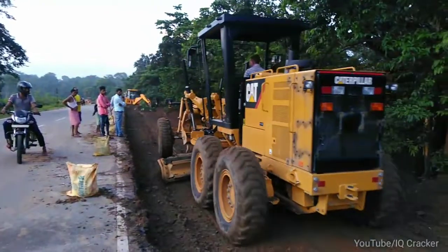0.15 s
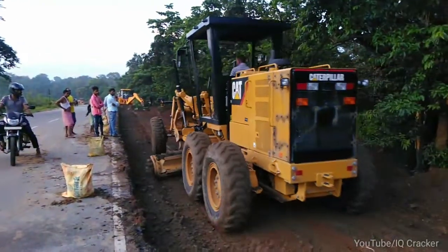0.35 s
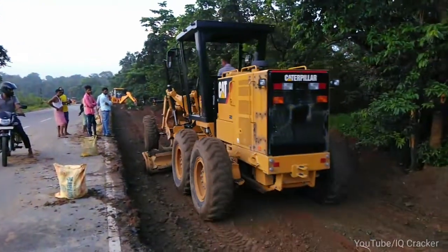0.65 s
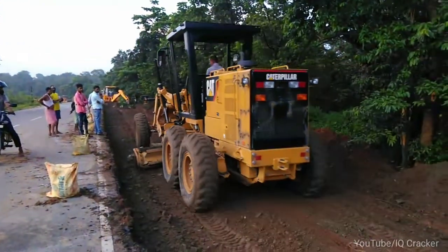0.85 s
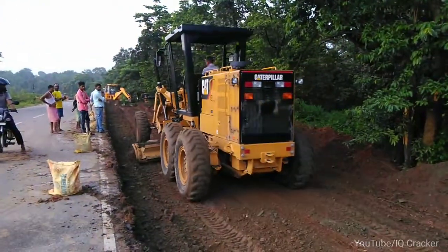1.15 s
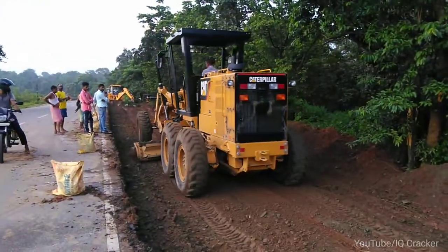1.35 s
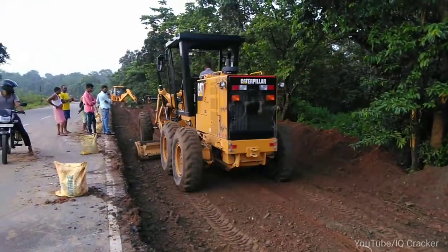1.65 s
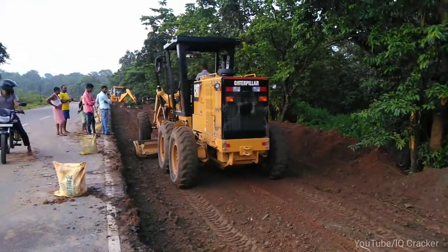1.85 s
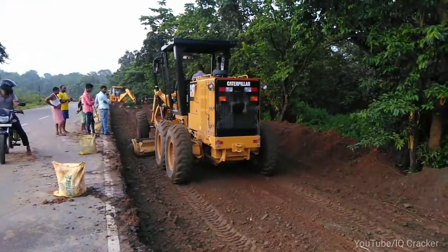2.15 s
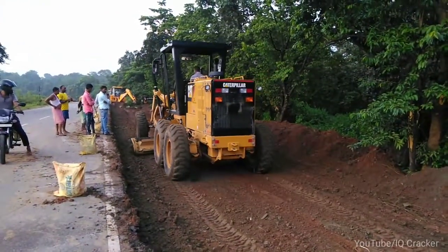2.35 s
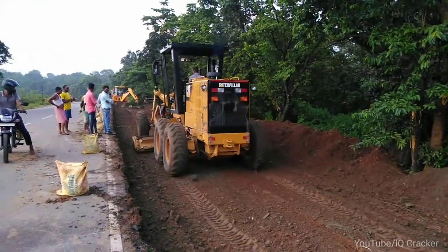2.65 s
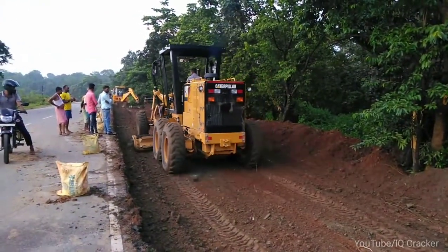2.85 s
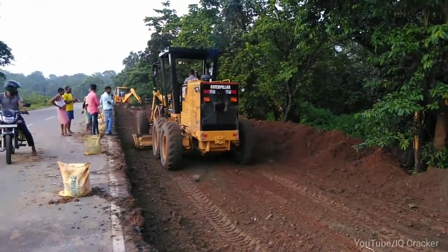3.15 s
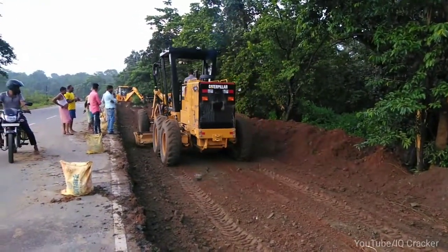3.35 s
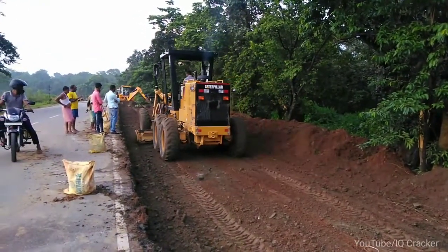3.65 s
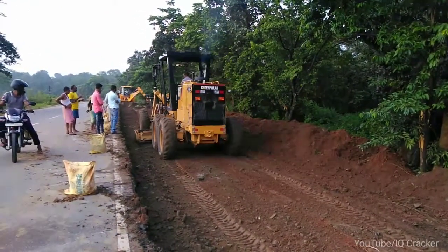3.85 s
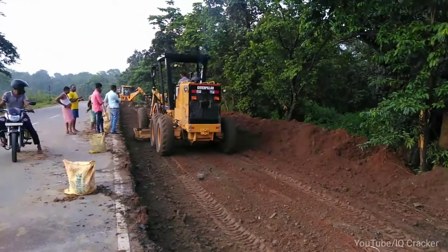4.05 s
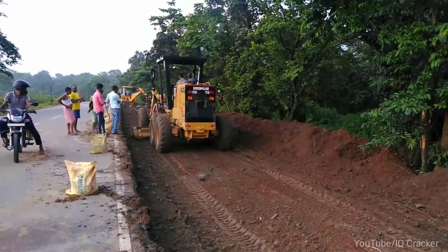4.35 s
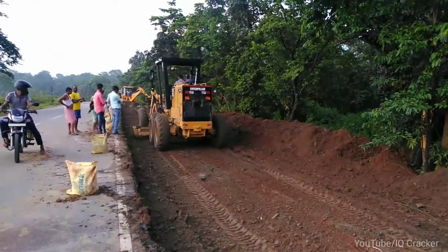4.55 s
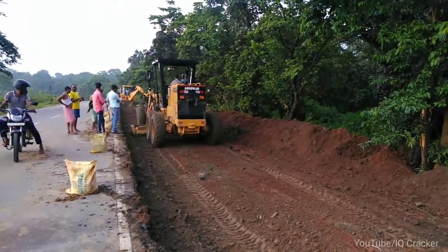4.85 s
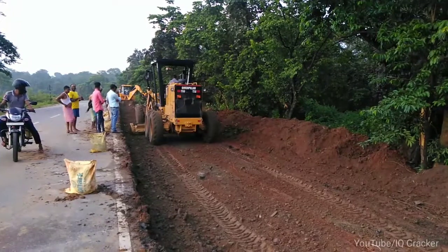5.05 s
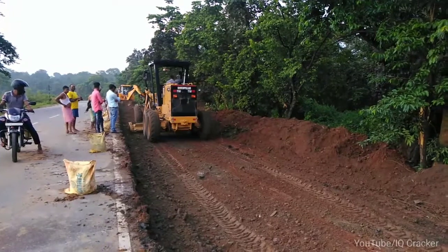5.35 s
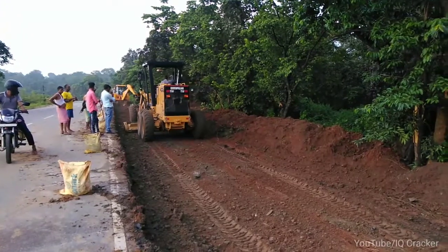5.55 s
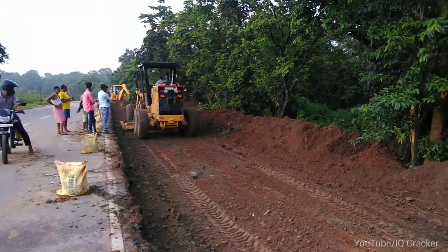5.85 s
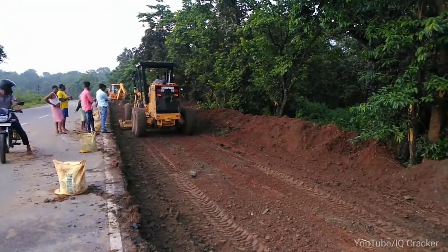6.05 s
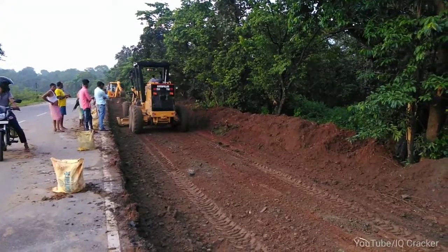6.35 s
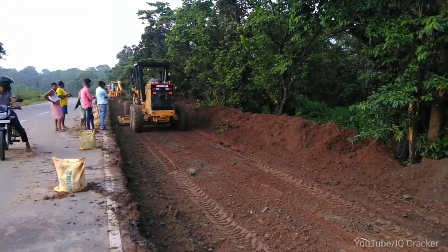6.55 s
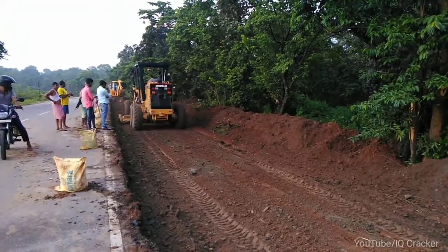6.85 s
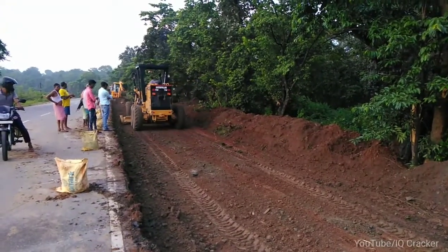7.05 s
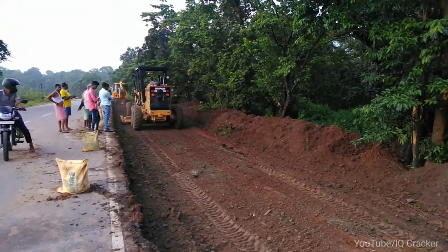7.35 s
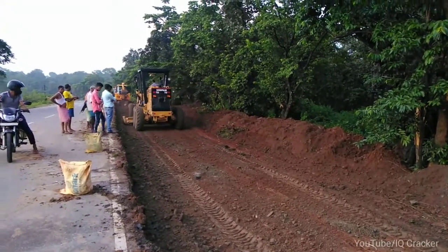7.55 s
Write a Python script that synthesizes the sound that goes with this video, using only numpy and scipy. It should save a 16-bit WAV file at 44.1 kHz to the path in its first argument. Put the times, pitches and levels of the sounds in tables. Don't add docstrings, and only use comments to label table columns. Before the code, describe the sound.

A heavy six-cylinder diesel machine runs lightly with whine and clatter, drops its revs through a clunking gear change, and lugs hard for under two seconds with deep booming puffs, a bright burst of rushing exhaust and rattling metal. The load abruptly lifts; quicker, thinner engine chatter recedes beside an earth bank, with scattered panel clanks. Open-air roadside, handheld stereo pickup, close at first and then farther away.

```python
import sys
import numpy as np
from scipy import signal
from scipy.fft import rfft, irfft, next_fast_len
from scipy.io import wavfile
from scipy.ndimage import uniform_filter1d, map_coordinates

SR = 44100
rng = np.random.default_rng(int(sys.argv[2]) if len(sys.argv) > 2 else 0)


def digitize_waveform(pressure):
    field = np.atleast_2d(pressure).T
    bounded = np.clip(field, -1, 1)
    quanta = np.round(bounded * 32767).astype(np.int16)
    wavfile.write(sys.argv[1], SR, quanta)


def gain_from_decibels(decibels):
    exponent = np.asarray(decibels, float) / 20
    return 10 ** exponent


N = 339129


def in_time(rows):
    s, *columns = np.transpose(rows)
    return [np.interp(np.arange(N) / SR, s, c) for c in columns]


def at_hz(rows, hz, axis=1):
    return np.interp(np.log(hz + 1), np.log(np.array(rows)[:, 0]), np.array(rows)[:, axis])


def rms_one(x):
    return x / np.sqrt(np.mean(x ** 2) + 1e-20)


def filtered(x, response):
    size = next_fast_len(N + 4096)
    hz = np.arange(size // 2 + 1) * SR / size
    return irfft(rfft(x, size) * response(hz), size)[..., :N]


def drift(rate_hz):
    r = np.exp(-80 * np.pi * rate_hz / SR)
    slow = signal.lfilter([1], [1, -2 * r, r * r], rng.standard_normal(N // 40 + 2002))[2000:]
    return np.interp(np.arange(N) / 40, np.arange(len(slow)), rms_one(slow))


def bumps(s, half_s, height):
    t = np.arange(N) / SR
    out = 0
    for centre_s, half, peak in np.broadcast(s, half_s, height):
        out = out + peak * np.cos(np.pi / 2 * np.clip((t - centre_s) / half, -1, 1)) ** 2
    return out


def swells(rows):
    s, half_s, db = np.transpose(rows)
    return bumps(s, half_s, gain_from_decibels(db))


def step(at_s, fade_s):
    return 1 / (1 + np.exp((at_s - np.arange(N) / SR) / fade_s))


def share_of(db, from_db, to_db):
    return np.clip((db - from_db) / (to_db - from_db), 0, 1)


def resonances(x, modes):
    out = 0
    for k, (hz, width, db) in enumerate(modes):
        r = np.exp(-np.pi * width / SR)
        b = np.array([1, 0, -1]) * (1 - r * r) / 2
        a = [1, -2 * r * np.cos(2 * np.pi * hz / SR), r * r]
        out = out + (-1) ** k * gain_from_decibels(db) * signal.lfilter(b, a, x)
    return out


def chopped(turns, depth, uneven_db, late):
    chance = rng.standard_normal(int(turns[-1]) + 3)
    strength = gain_from_decibels(uneven_db * depth * np.interp(turns - late, np.arange(len(chance)), chance))
    angle = 2 * np.pi * (turns - late)
    puff = strength * (0.16 + np.exp(depth * np.cos(angle + 0.57 * np.cos(angle))))
    puff = puff / np.sqrt(uniform_filter1d(puff ** 2, size=6000))
    return puff * rng.standard_normal((2, N))


def patchy(x, spectrum, patchy_db):
    low_hz, high_hz = spectrum[0][0], spectrum[-1][0]
    width = np.log(high_hz / low_hz) / 6
    out = 0
    for hz in np.geomspace(low_hz, high_hz, 7):
        band = lambda f: gain_from_decibels(at_hz(spectrum, f)) * np.clip(1 - abs(np.log((f + 1) / hz)) / width, 0, 1)
        out = out + gain_from_decibels(patchy_db * drift(8)) * filtered(x, band)
    return rms_one(out)


# (time [s], firing rate [Hz])
SPEED = [(0, 79.9), (.4, 80.05), (.65, 83.4), (.9, 80.84), (1.62, 80.9), (1.78, 74.3), (2.1, 70.2),
         (2.24, 61.4), (2.45, 59.4), (2.72, 60.88), (3.05, 60.2), (3.5, 73.52), (3.75, 76.9), (4, 82.2),
         (4.64, 86.1), (5.92, 79.6), (6.5, 83.0), (7.69, 82.4)]
# (time [s], level [dB])
FUEL = [(0, -38), (.17, -35), (.79, -41), (1.2, -37.5), (1.73, -39), (1.84, -49), (1.92, -43.5),
        (2.195, -53), (2.23, -34.5), (2.38, -24), (2.6, -20), (2.68, -15.5), (3.3, -14.5), (3.64, -17.5),
        (4.0, -21.5), (4.15, -38), (4.4, -40), (7.69, -41.5)]
# (time [s], level [dB])
FLOW = [(0, -36.5), (.45, -47.5), (.73, -44.5), (1.43, -47), (1.97, -52.5), (2.27, -54.5), (2.36, -47.5),
        (2.55, -44), (2.63, -34), (3.05, -27), (3.2, -30.5), (3.45, -28.5), (3.6, -26), (3.98, -31),
        (4.11, -44), (4.6, -46), (4.8, -50), (7.69, -50)]


def driving():
    return in_time(SPEED)[0], in_time(FUEL)[0], in_time(FLOW)[0]


# (time [s], half length [s], rush [dB], clatter [dB], sizzle [dB])
SURGES = [(2.897, 0.1, 0.5, 0, 25), (3.06, 0.12, 0, -1.5, 30.5), (3.288, 0.08, 2.5, 0, 5),
          (3.56, 0.087, 2.5, -1, 14), (3.73, 0.054, -0.5, 1, 10), (3.833, 0.064, 1.5, 1, 13),
          (4.58, 0.14, -0.5, -1, 5), (5.763, 0.03, 6.5, -2, -5), (2.6, .06, 2, 0, -8),
          (6.3, 0.046, 2.5, 0.5, -4), (5.918, 0.5, 6, 4, -1.5), (6.028, 0.1, 6, -1, -2),
          (6.221, 0.14, 4.5, -1.5, -10), (6.353, 0.045, 6, -1.5, -10), (6.755, 0.38, 6, 3.5, -2),
          (6.348, 0.37, 3, 3, 1), (7.398, 0.52, 2, -1, 4), (0.425, 0.33, 8, 7, 1),
          (1.272, 0.033, 5, 0.5, 0.1)]


def surges_db():
    s, half_s, *gains = np.transpose(SURGES)
    return [bumps(s, half_s, db) for db in gains]


# (time [s], gain [dB])
JOLTS = [(2.354, 5), (2.554, 8), (2.604, 9), (2.621, 9), (2.654, 5), (2.688, 4), (2.704, 4), (2.752, 8),
         (2.801, 5), (2.819, 5), (2.851, 3), (2.900, 5), (2.950, 5), (3.0, 4), (3.017, 7), (3.048, 4),
         (3.097, 8), (3.414, 7), (3.495, 5), (3.658, 4), (3.738, 5), (3.789, 4)]


def judder_db():
    t, dies_s = np.arange(N) / SR, .005
    return sum(db * (t > s) * np.exp(-abs(t - s) / dies_s) for s, db in JOLTS)


# (frequency [Hz], level [dB per Hz])
RUMBLE = [(25, -44), (45, -26), (75, -9), (110, -17), (150, -4), (190, -11.5), (230, -7.5), (320, -12),
          (400, -25.5), (480, -16.5), (800, -16), (950, -25), (1100, -17), (1400, -16.5)]
# (frequency [Hz], width [Hz], level [dB])
SILENCER = [(143, 4.4, -54), (295, 32, 49)]
ASIDE_M, AHEAD_M, RECEDES_M_PER_S = 3.2, 3.67, 1.89


def rumble(turns, depth, lugged_hz, load):
    range_m = np.hypot(ASIDE_M, AHEAD_M + RECEDES_M_PER_S * np.arange(N) / SR)
    rumble_db = -32 - 20 * np.log10(range_m / range_m[0])
    rumble_db = rumble_db - 0.24 * lugged_hz + 3.5 * load
    rumble_db = rumble_db - 3 * step(7, .25)
    near = 1.08 + (0.13 - 1.08) * step(3.25, 0.88)
    gas = chopped(turns, 0.26 * depth, uneven_db=9.0, late=0.069)
    sound = patchy(gas, RUMBLE, patchy_db=2.0) + near * rms_one(resonances(gas, SILENCER))
    return gain_from_decibels(rumble_db) * sound / np.sqrt(1 + near ** 2)


# (time [s], peak [dB], frequency [Hz])
KNOCKS = [
    (1.792, -33, 754),
    (2.192, -30.5, 820),
]


def knocks():
    out = np.zeros(N)
    for s, db, hz in KNOCKS:
        t = np.arange(N - round(s * SR)) / SR
        out[round(s * SR):] += gain_from_decibels(db) * np.exp(-t / 0.0069) * np.sin(2 * np.pi * hz * t)
    return out


# (time [s], peak [dB], frequency [Hz])
PANEL_CLANKS = [(2.6878, -33, 2310), (2.8499, -37, 2640), (2.9652, -32, 2320), (3.1433, -35, 1740),
                (3.3717, -20, 1750), (3.4431, -28, 1710), (3.5339, -31, 1745), (3.6591, -33, 2250),
                (3.7524, -29, 1810), (3.8162, -34, 2500), (3.9619, -27, 1700),
                (5.906, -45, 1720),
    (6.0541, -41, 1740),
    (6.104, -38.5, 1790),
    (6.2003, -43, 1730),
    (6.3021, -40, 1740),
    (6.3495, -29, 1740),
    (6.4887, -53, 1860),
    (6.5565, -40, 1810),
    (6.6583, -50, 1850),
                (6.0801, -39, 2620),
    (6.3879, -39, 2800),
    (6.5216, -43, 2640),
    (6.6413, -43, 2690),
    (6.7161, -41, 2730),
    (6.7605, -24.5, 2680),
    (6.8563, -30.5, 2810),
    (7.4406, -49, 2460),
    (7.649, -50, 2590),
                (5.9035, -41, 3750),
    (6.0038, -43, 3720),
    (6.29, -46, 3830),
    (6.412, -39.5, 3880),
    (6.6034, -38, 3860),
    (6.9307, -44, 4220),
]


def clanks():
    out, t = np.zeros(N + SR), np.arange(SR // 8) / SR
    swell_s, gain_db = .0045, 2
    for s, db, hz in PANEL_CLANKS:
        pair = np.sin(2 * np.pi * hz * t) + .4 * np.sin(2 * np.pi * hz * rng.uniform(.96, 1.04) * t)
        out[round(s * SR):][:len(t)] += gain_from_decibels(db + gain_db) * t / swell_s * np.exp(1 - t / swell_s) * pair
    return out[:N]


# (time [s], half length [s], peak [dB])
SHUDDERS = [
    (2.38, 0.31, -36),
    (2.86, 0.11, -34),
    (3.12, 0.36, -34),
    (4.1, 0.13, -50),
]


def shudder():
    t = np.arange(N) / SR
    hz = 40.6 - 35 * np.maximum(t - 3.1, 0)
    return swells(SHUDDERS) * np.sin(2 * np.pi * np.cumsum(np.maximum(hz, 29)) / SR)


GEAR_TEETH = 13.67, 18.86
# (time [s], half length [s], peak [dB])
FORWARD_WHINE = [
    (.1, 0.76, -43.5),
    (.39, 0.14, -39),
    (1.006, 1, -50),
]
WORKING_WHINE = [
    (2.8, 0.48, -55),
    (3.2, 0.11, -46),
    (3.52, .13, -52),
    (4.0, 0.23, -59),
    (4.5, 0.33, -47),
    (5.7, 0.67, -52),
    (6.4, 0.4, -51),
]
# (time [s], half length [s], peak [dB])
WHINE_ECHO = [
    (3.52, 0.24, 20),
    (4.4, 0.26, -1),
    (5.75, 0.37, 0),
    (6.3, .4, -2.5),
]


def gears(turns):
    cruise = gain_from_decibels(-47.5) * step(4.9, .3)
    out = 0
    for teeth, height in zip(GEAR_TEETH, (swells(FORWARD_WHINE), swells(WORKING_WHINE) + cruise)):
        flutter = gain_from_decibels(2.6 * drift(12))
        out = out + gain_from_decibels(3.5) * height * flutter * np.sin(2 * np.pi * teeth * turns + 1.1 * drift(14))
    return out * np.array([swells(WHINE_ECHO), np.ones(N)])


def over_ground(x):
    echo_s, echo_db = 1.05 / 1000, -9
    return filtered(x, lambda hz: 1 - gain_from_decibels(echo_db) * np.exp(-2j * np.pi * hz * echo_s))


# (frequency [Hz], level [dB per Hz])
CLATTER = [(700, -32), (1000, -28), (1400, -8.5), (2000, 5.5), (2700, 6.5), (3200, 3), (4500, -7.5),
           (5500, -47), (7000, -71)]
# (frequency [Hz], level [dB per Hz])
LUGGING = [(850, -23), (1150, -3), (1450, -6), (1750, 0.5), (2050, -5), (2500, 2.5), (3000, 4), (3400, 0),
           (3800, -9), (4200, -13.5), (4800, 1.5), (5200, 3)]
# (frequency [Hz], width [Hz], level [dB])
BLOCK = [(1280, 210, -13.5), (1750, 110, 10.5), (2267, 120, 0.5), (2680, 110, 10.5), (3860, 150, 8),
         (4585, 930, 0.5), (4780, 160, 4), (6420, 270, -9)]


def clatter(turns, depth, load, clatter_db):
    clatter_db = clatter_db + 0.94 - 10.5 * load
    tilt_db = 2 - 4.5 * load + 4 * step(7.7, .2)
    knock = chopped(turns, 0.21 * depth, uneven_db=3.0, late=.9)
    light = patchy(knock, CLATTER, patchy_db=1.86)
    broad = (1 - load) * light + load * patchy(knock, LUGGING, patchy_db=1.5)
    rings = 0
    for mode in BLOCK:
        rings = rings + resonances(chopped(turns, 0.91 * depth, uneven_db=5.0, late=0.822), [mode])
    sound = rms_one(broad + 1.05 * rms_one(rings))
    upper = filtered(sound, lambda hz: np.clip(np.log2((hz + 1) / 2400) / 1.13, 0, 1))
    tilted = gain_from_decibels(-tilt_db) * (sound - upper) + gain_from_decibels(tilt_db) * upper
    return over_ground(gain_from_decibels(clatter_db + 8.5) * tilted)


def brightened(x, top_db):
    top = filtered(x, lambda hz: 1 / (1 + (9050 / (hz + 1)) ** 11.0))
    return x + (gain_from_decibels(top_db) - 1) * top


# (frequency [Hz], level [dB per Hz])
FAN = [(4000, -14), (5000, -3.5), (6500, -2), (8000, -4), (11000, 1.5), (12300, -8.5), (13500, -9.5)]
BARK = [(4900, -36), (5080, -3.5), (5500, 0.5), (6000, -4), (6450, -4.5), (6800, -3.5), (8400, -7),
        (9250, -2), (9500, -7.5), (11800, -11), (13000, -19)]
SIZZLE = [(11500, -17), (12500, 0), (14000, -5), (15700, -28)]
# (frequency [Hz], width [Hz], level [dB])
STACK = [(5150, 140, -2), (5390, 200, -1.5), (5980, 200, 1.5), (6420, 200, 0), (7570, 170, -8.5),
         (8430, 200, -8), (9250, 320, -3.5), (9200, 100, -12), (10450, 230, -10.5)]
BARK_FROM_DB, BARK_TO_DB = -48, -33


def rush(turns, depth, load, rush_db, sizzle_db, sizzle_surge_db):
    sizzle_db = sizzle_db - 11 - 37 * load
    barking = share_of(rush_db, BARK_FROM_DB, BARK_TO_DB)
    fan = patchy(chopped(turns, 0.7 * depth, uneven_db=3.0, late=0.89), FAN, patchy_db=2.0)
    gas = chopped(turns, 0.98 * depth, uneven_db=1.6, late=0.865)
    rings = 0
    for mode in STACK:
        rings = rings + resonances(chopped(turns, 1.0 * depth, uneven_db=6.5, late=0.87), [mode])
    bark = rms_one(patchy(gas, BARK, patchy_db=1.2) + .8 * rms_one(rings))
    sizzle = patchy(gas, SIZZLE, patchy_db=2.0)
    air = gain_from_decibels(rush_db + 5) * (np.sqrt(1 - barking) * fan + np.sqrt(barking) * bark)
    air = air + gain_from_decibels(sizzle_db + 3) * sizzle
    screened_db = -7.5 * step(6.29, 0.066)
    return brightened(air, 0.33 * sizzle_surge_db - 4.5 * load + screened_db)


# (order [per cycle], level [dB])
CYCLE = [(3, -21.5), (4, -36), (5, -21), (6, 3), (7, -34), (8, -26), (9, -22.5), (10, -22), (11, -30.5),
         (12, -23.5), (13, -27.5), (14, -51), (15, -38)]
# (time [s], loss [dB])
CUTS = [(2.72, 3), (2.96, 2), (3.08, 2), (3.21, 2.5), (3.41, 3.5), (3.46, 5), (3.53, 2.5), (3.73, 6.5),
        (3.85, 7), (3.961, 6), (4.048, 13), (4.219, 7), (5.44, 5), (5.679, 2), (6.118, -1), (7.19, 7)]


def boom(turns, fuel_db, pull, lugged_hz):
    cut_s, cut_db = np.transpose(CUTS)
    boom_db = fuel_db - bumps(cut_s, 0.044, cut_db)
    second_db = -14 + pull * (-3 - .85 * lugged_hz)
    tone = gain_from_decibels(second_db) * np.cos(4 * np.pi * turns + 3.9)
    for k, db in CYCLE:
        loose = k != 6
        angle = 2 * np.pi * (k * turns / 6 + loose * (.37 * k * k + .2 * drift(6)))
        tone = tone + gain_from_decibels(db + loose * 3.9 * drift(5.0)) * np.cos(angle)
    return gain_from_decibels(boom_db + 1.0 + 1.8 * drift(26.3)) * tone


FREE_HZ = 83.1


def scene():
    firing_hz, fuel_db, flow_db = driving()
    turns, lugged_hz = np.cumsum(firing_hz) / SR, FREE_HZ - firing_hz
    pull, load = share_of(fuel_db, -43, -16), share_of(flow_db, BARK_FROM_DB, BARK_TO_DB)
    depth = np.clip(0.43 + 0.019 * pull * lugged_hz + 0.037 * load, 0, 2)
    puffs = turns - .006 * pull * lugged_hz
    surges = surges_db()
    rush_db, clatter_db, sizzle_db = (flow_db + judder_db() + db for db in surges)
    ground = rumble(turns, depth, lugged_hz, load)
    tones = knocks() + shudder() + boom(turns, fuel_db, pull, lugged_hz)
    knocking = clatter(puffs, depth, load, clatter_db)
    air = rush(puffs, depth, load, rush_db, sizzle_db, surges[2])
    return ground + clanks() + gears(turns) + knocking + air + tones * [[0], [1]]


def masked(x):
    def band_power(v):
        power = abs(v[..., :1024, :]) ** 2
        return np.repeat(power.reshape(*v.shape[:-2], 256, 4, -1).mean(-2), 4, axis=-2)

    hz, s, z = signal.stft(x, SR, window="cosine", nperseg=2048, noverlap=1024)
    treble = hz[:1024, None] > 1400
    z = z[:, :1024]
    whole = np.mean(abs(z[1, 50:550]) ** 2, axis=0)
    z = z * ~(treble & (band_power(z) < whole * gain_from_decibels(-18) ** 2))
    centre, sides = (z[0] + z[1]) / 2, (z[0] - z[1]) / 2
    hidden = np.minimum(band_power(sides) * gain_from_decibels(-6) ** 2, whole * gain_from_decibels(-5.5) ** 2)
    centre = centre * ~(treble & (band_power(centre) < hidden))
    z = np.pad([centre + sides, centre - sides], ((0, 0), (0, 1), (0, 0)))
    return signal.istft(z, SR, window="cosine", nperseg=2048, noverlap=1024)[1][:, :N]


# (frequency [Hz], gain [dB], share of sound common to both [0-1])
LEFT_PORT = [(60, 1, .96), (300, 2, .97), (600, -1.5, .93), (900, 3, .68), (1200, -1.5, .8),
             (1450, 2.5, .75), (1600, 0, .89), (1800, -5, .5), (2000, 0, .68), (2300, -4, .38),
             (2600, -1, .8), (2900, 0, .79), (3300, -2, .55), (3600, -1, .68), (3900, 0, .88),
             (4200, 0, .86), (4600, -1, .85), (4900, -.5, .88), (5600, -3, .75), (6600, -14, .4),
             (8000, -13, .5), (10300, -18, .4), (11500, -9, .3), (15500, -9, .3)]
# (frequency [Hz], phase [rad])
LEFT_PHASE = [(0, -.15), (90, -.15), (300, -.4), (600, -.4), (900, -1.6), (1200, -.8), (1450, -2.6),
              (1600, -3.2), (1800, -2.8), (2000, -3.0), (2600, -3.2), (2900, -3.4), (3300, -4),
              (3700, -4.7), (4100, -5.6), (4500, -6.3), (4900, -6.8), (5200, -7.5), (5600, -8.1),
              (6100, -9.4), (10000, -21.7), (15300, -40)]
# (time [s], lead of the left port [ms])
BEARING = [(0, 0.122), (.1, .114), (.3, 0.108), (.37, 0.085), (.65, 0.083), (1.3, 0.066), (2, 0.05),
           (2.6, .016), (5.2, 0.014), (6.3, 0.0043), (7.69, 0.0014)]


def ports(scattered, direct):
    share = lambda hz: np.clip(at_hz(LEFT_PORT, hz, axis=2), 0, 1)
    port = lambda hz: gain_from_decibels(at_hz(LEFT_PORT, hz)) * np.exp(1j * np.interp(hz, *np.transpose(LEFT_PHASE)))
    left = filtered(direct, lambda hz: port(hz) * share(hz))
    left += filtered(scattered, lambda hz: port(hz) * np.sqrt(1 - share(hz) ** 2))
    lead_ms = in_time(BEARING)[0] + .004 * drift(4.0)
    left = map_coordinates(left, [np.arange(N) + lead_ms * SR / 1000], order=3, mode="nearest")
    right = filtered(direct, lambda hz: 1j * hz / (65 + 1j * hz))
    return np.array([left, right])


def low_pass(x):
    return signal.sosfilt(signal.butter(12, 15760, fs=SR, output="sos"), x)


def record(dry):
    scattered, direct = dry
    mix = masked(ports(scattered, direct))
    return low_pass(mix)


dry = scene()
out = record(dry)
digitize_waveform(out)
```